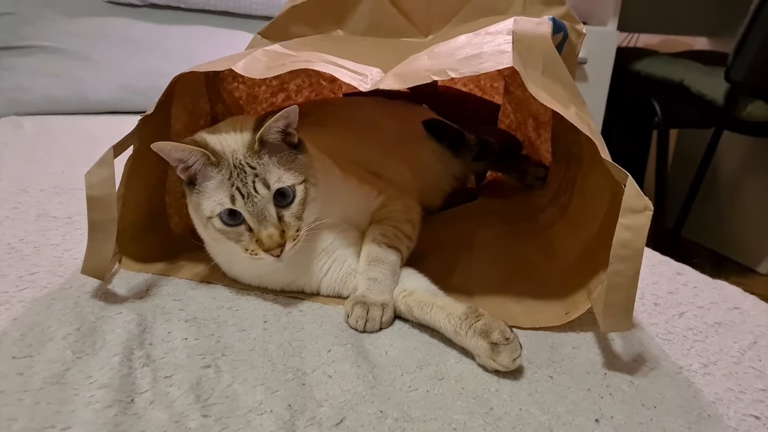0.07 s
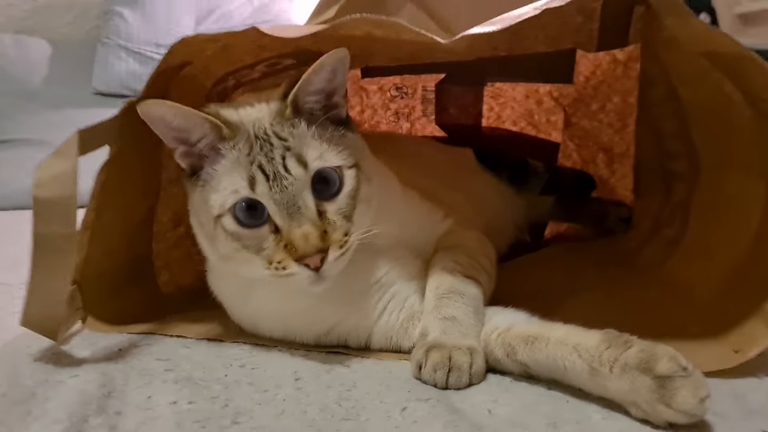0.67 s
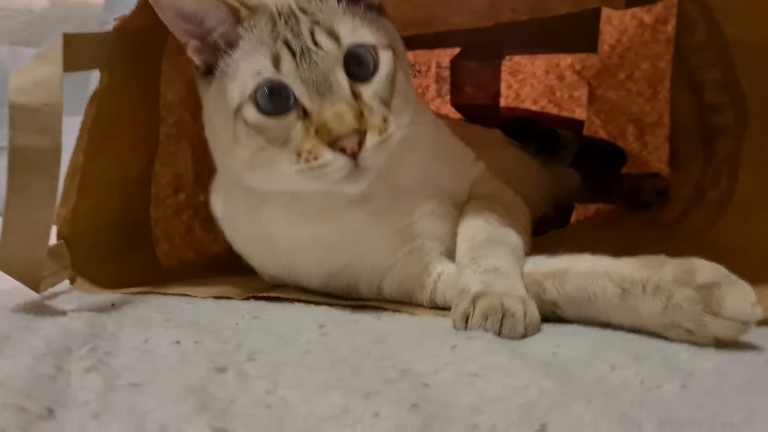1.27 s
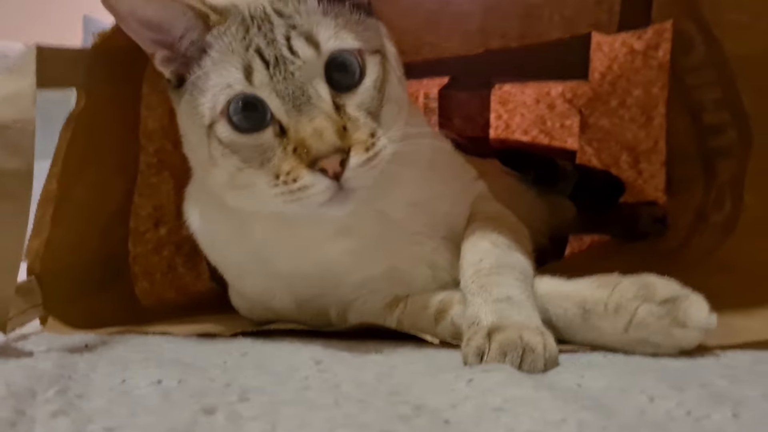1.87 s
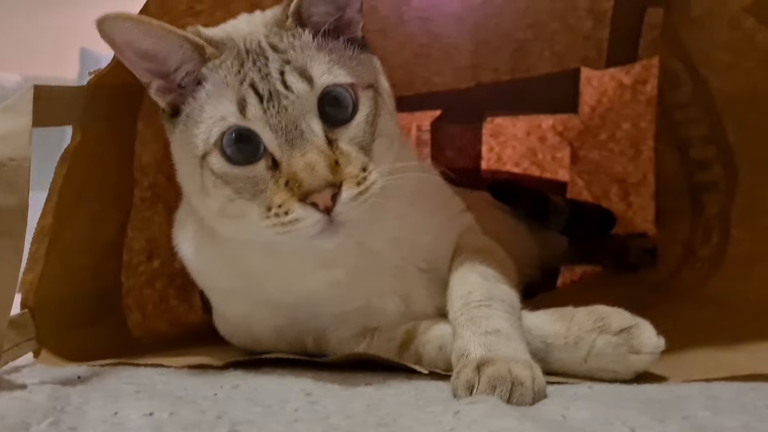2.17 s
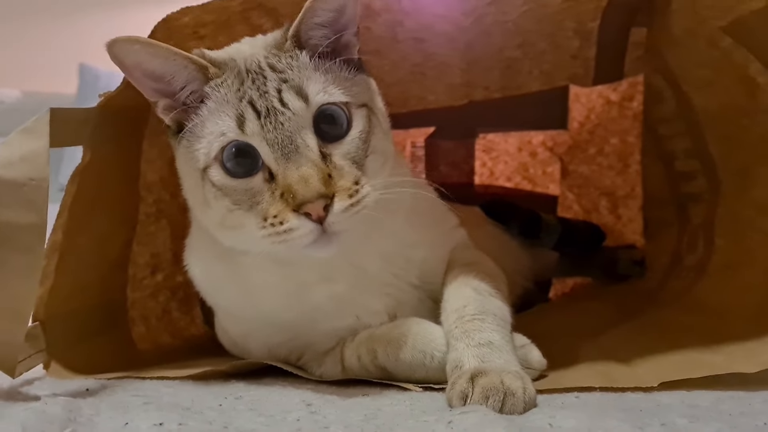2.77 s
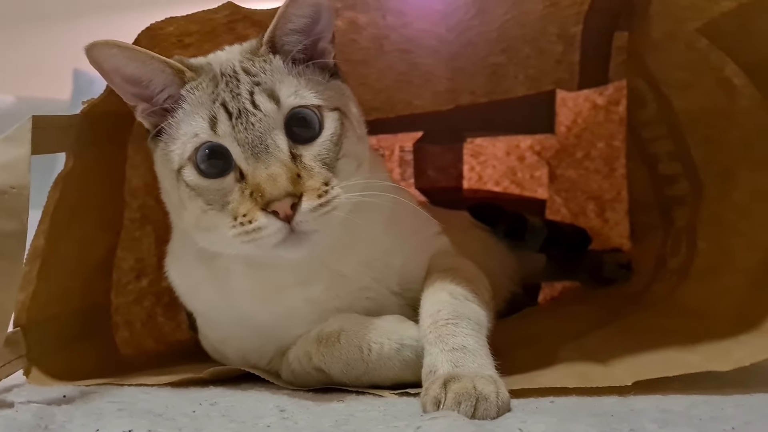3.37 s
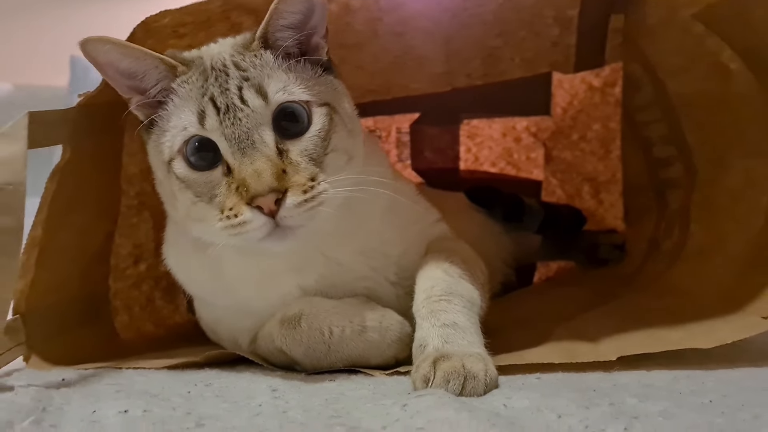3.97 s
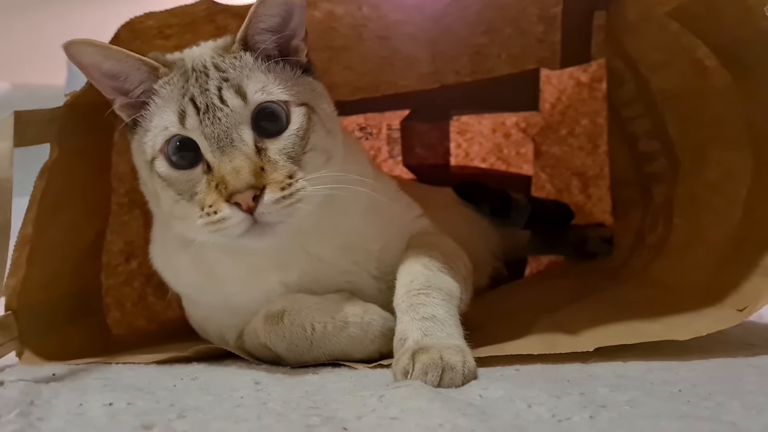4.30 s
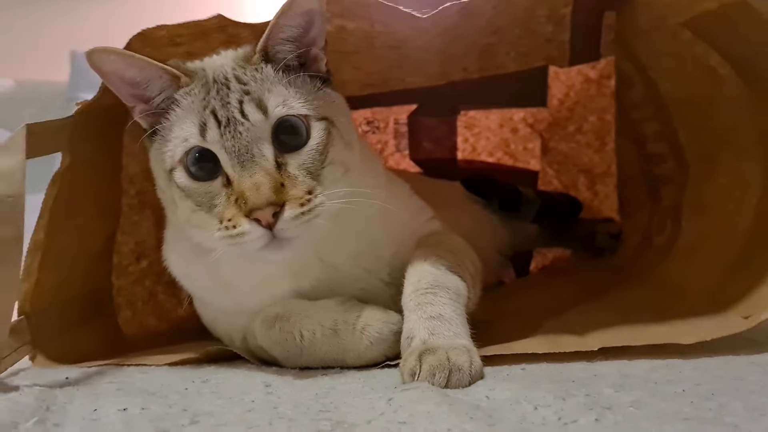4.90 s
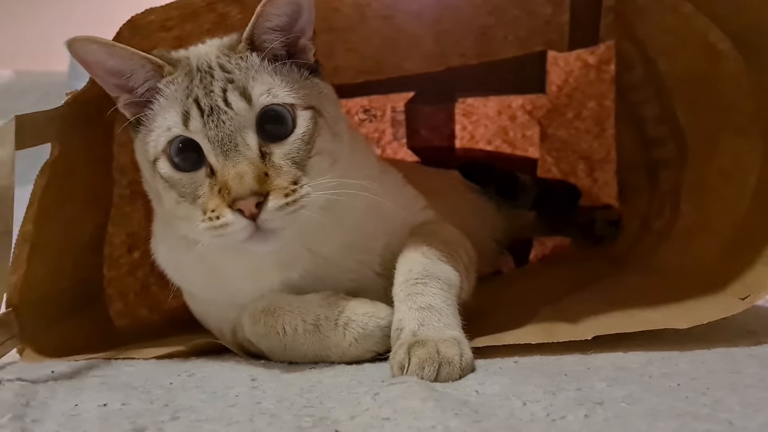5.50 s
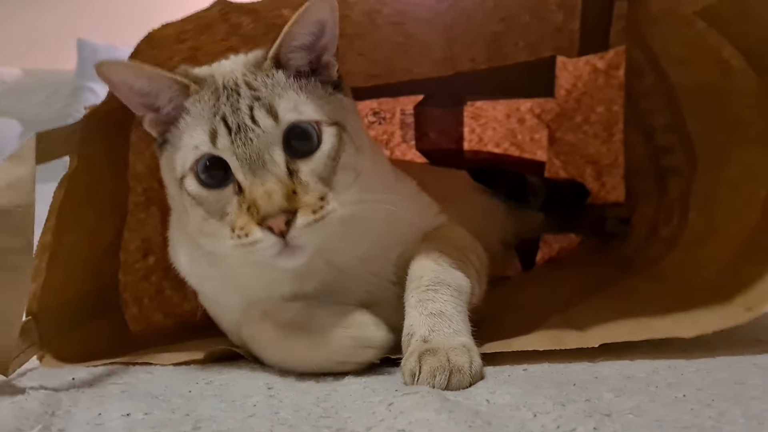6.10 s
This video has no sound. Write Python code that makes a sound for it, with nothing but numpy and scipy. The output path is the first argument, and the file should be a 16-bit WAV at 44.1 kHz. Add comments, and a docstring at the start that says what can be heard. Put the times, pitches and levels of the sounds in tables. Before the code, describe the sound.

Quiet paper bag ticks and slides, then close, hissing, thumping sweeps over fabric about twice a second in a still room.

```python
"""A quiet room with a faint mains hum; a cat lies in a paper bag on a blanket.
First the stiff paper slides, ticks as its creases snap, and squeaks thinly along an edge.
Then, close to the microphone, something sweeps over the fabric: once alone, then to and fro
about twice a second. Each stroke hisses, flutters and thumps as the surface drags and catches,
while the paper keeps ticking and sliding in between."""
import sys
import numpy as np
from scipy import signal
from scipy.fft import rfft, irfft
from scipy.io import wavfile
from scipy.ndimage import uniform_filter1d

SR = 44100
rng = np.random.default_rng(int(sys.argv[2]) if len(sys.argv) > 2 else 0)


def store_pcm(level_fs):
    """Save levels as 16-bit WAV."""
    pcm = np.round(np.clip(level_fs, -1, 1) * 32767).astype(np.int16)
    wavfile.write(sys.argv[1], SR, np.atleast_2d(pcm).T)


N = 275625
T, HZ = np.arange(N) / SR, np.fft.rfftfreq(N, 1 / SR)


def amp(db):
    """Decibels to gain."""
    return 10 ** (np.asarray(db) / 20)


def unit(x):
    """Scales to rms 1."""
    return x / np.sqrt(np.mean(x ** 2) + 1e-20)


def curve(points, hz):
    """Reads a breakpoint curve on a log-frequency axis."""
    freq_hz, value = np.transpose(points)
    return np.interp(np.log(hz + 1), np.log(freq_hz + 1), value)


def pan(pan_db):
    """Constant-power pan; pan_db is left over right."""
    pair = amp(np.array([[.5], [-.5]]) * pan_db)
    return pair / np.sqrt(np.mean(pair ** 2, 0))


def add(mix, start_s, sound):
    """Lays a stereo sound into the mix."""
    part = mix[:, max(round(start_s * SR), 0):][:, :sound.shape[1]]
    part += sound[:, :part.shape[1]]


def noise(spectrum, correlation):
    """Coloured stereo noise whose channels are partly alike."""
    left, other = rfft(rng.standard_normal((2, N)))
    alike = np.clip(curve(correlation, HZ), -1, 1)
    right = alike * left + np.sqrt(1 - alike ** 2) * other
    return unit(irfft(np.array([left, right]) * amp(curve(spectrum, HZ)), N))


def wander(rate_hz):
    """Smooth random modulation of rms 1."""
    return unit(irfft(rfft(rng.standard_normal(N)) * np.exp(-(HZ / rate_hz) ** 2), N))


def pulse(colour_db, size=4096):
    """The sharpest causal pulse with a given colour, peak 1."""
    log_gain = np.log(amp(colour_db(abs(np.fft.fftfreq(size, 1 / SR)))))
    wave = np.fft.ifft(np.exp(signal.hilbert(log_gain).conj())).real[:size // 2]
    return wave / abs(wave).max()


# Colour of the still air: freq_hz, gain_db
AIR_EQ = [(25, -16.5), (55, 4), (120, -4), (170, -8), (330, -6.5), (600, -12.5), (900, -16.5),
          (3000, -17.5), (5000, -21.5), (6800, -24.5), (7800, -36.5), (11000, -32.5), (12500, -30),
          (15500, -35.5)]
# Stereo image of the air: freq_hz, correlation
AIR_IMAGE = [(60, 0.22), (130, 0.61), (290, 0.71), (640, 0.41), (1400, 0.036)]
# Mains hum partials: pitch_hz, level_db
HUM_PARTIALS = [(102.3, -80), (199.2, -74), (301.5, -88), (398.4, -85)]


def room_tone(air_db=-69.5):
    """A bed of still air and slightly wavering mains hum."""
    hum = np.zeros(N)
    for pitch_hz, level_db in HUM_PARTIALS:
        phase = 2 * np.pi * pitch_hz * T + .5 * wander(rate_hz=3.7)
        hum += amp(level_db) * np.sqrt(2) * np.sin(phase)
    air = noise(AIR_EQ, AIR_IMAGE) * amp(air_db)
    return air * pan(-5) + hum * pan(-2.5)


# Reverb time by band: freq_hz, t60_s
ROOM_DECAY = [(100, 0.37), (400, 0.24), (1500, .33), (4000, 0.29), (12000, 0.054)]


def reverb(x, predelay_s=0.0062):
    """A small furnished room: sparse reflections, each band dying at its own speed."""
    taps = rng.standard_normal((2, SR)) * (rng.random((2, SR)) < .1) * (T[:SR] > predelay_s)
    hz, t, bands = signal.stft(taps, SR, nperseg=256)
    decay = amp(-60 * t / curve(ROOM_DECAY, hz)[:, None])
    tail = signal.istft(bands * decay, SR, nperseg=256)[1]
    return signal.fftconvolve(x, tail / np.linalg.norm(tail[0]), axes=1)[:, :N]


def bell(centre_hz, width_octaves):
    """A bell-shaped resonance on a log-frequency axis."""
    octaves_off = np.log2((np.fft.rfftfreq(SR, 1 / SR) + 1) / centre_hz)
    return 1 / (1 + .5 * (octaves_off / width_octaves) ** 2) ** 2


def scrape(colour, attack_s, decay_s, ripple_db=3, ripple_hz=110):
    """Friction noise swells and dies away, coloured by a paper panel's many close resonances."""
    t = T[:SR]
    swell = np.minimum(t / attack_s, 1) * np.exp(-np.maximum(t - attack_s, 0) / decay_s)
    panel = amp(ripple_db * unit(uniform_filter1d(rng.standard_normal(len(colour)), ripple_hz)))
    friction = rfft(rng.standard_normal((2, SR)))
    return unit(irfft(friction * colour * panel, SR)) * swell


# Slide cues: start_s, attack_s, decay_s, level_db, centre_hz, width_octaves
SLIDE_CUES = [ (0.25, .04, 0.28, -81.5, 5400, 0.57), (0.31, .025, 0.027, -64, 2600, 0.3),
              (0.33, 0.013, 0.11, -69, 370, 1.75), (0.481, 0.016, 0.32, -74, 4570, 0.98),
              (0.62, 0.013, 0.052, -67, 1370, 0.35), (0.67, 0.031, 0.3, -69, 2660, 0.33),
              (0.72, 0.012, 0.05, -65, 413, 0.55), (1.19, 0.05, 0.14, -72, 2700, 1.5),
              (1.48, 0.028, 0.1, -64.5, 130, 2), (1.70, 0.037, 0.25, -71, 4020, 1.26),
              (1.78, .04, 0.12, -65.5, 197, 1.33), (1.92, 0.024, 0.054, -56.5, 650, 0.91),
              (1.997, 0.003, 0.002, -50, 5950, 0.27), (2.14, 0.045, 0.15, -73.5, 4860, 0.86),
              (2.55, 0.0079, .017, -48, 2240, 1), (2.991, .006, 0.028, -54, 378, 1.12),
              (3.35, 0.065, 0.058, -69, 530, 0.78), (3.686, 0.0014, 0.016, -52, 3020, 0.6),
              (3.729, 0.012, 0.38, -75, 2620, 1.7), (4.2, .002, 0.011, -60, 6840, 0.38),
              (4.211, 0.043, 0.026, -61.5, 2140, 1.4), (4.357, 0.028, 0.028, -56, 375, 0.76),
              (4.85, 0.0044, 0.024, -52, 1630, 0.55), (4.889, 0.02, 0.013, -53.5, 2540, 0.4),
              (5.33, 0.046, 0.035, -57, 420, 1.2)]
# Bright slides sit further right: centre_hz, pan_db
SLIDE_PAN = [(300, -2), (1400, -3.5), (3000, -11), (6000, -8)]


def slides():
    """Paper and fur slide and settle as the cat shifts in the bag."""
    out = np.zeros((2, N))
    for start_s, attack_s, decay_s, level_db, centre_hz, width_octaves in SLIDE_CUES:
        slide = scrape(bell(centre_hz, width_octaves), attack_s, decay_s)
        add(out, start_s, amp(level_db) * slide * pan(curve(SLIDE_PAN, centre_hz)))
    return out


def buckle(decay_s=0.0036, count=11, size=220):
    """A crease gives way in a few jerks within five milliseconds."""
    jerks, at = np.zeros(size), rng.integers(8, size, count)
    jerks[at] = rng.choice([-1, 1], count) * np.exp(-T[at] / decay_s)
    jerks[0] = 1
    return jerks


# Crease snaps: start_s, level_db, bass_db, treble_db, ring_hz, pan_db, send_db
TICK_CUES = [ (0.535, -30, 4, -5.5, 1070, -2.5, 0.5), (0.628, -32, 4.5, -13, 1050, -1, -2.5),
             (1.440, -36, 19, -30, 600, -5, -1), (1.9982, -15.5, 8, -13, 1285, -4.5, -10),
             (2.272, -21, 9, 2, 1020, -2, -3.5), (2.548, -12.5, -27, -9.5, 3100, 3, -9),
             (2.994, -26, 9, -36, 1090, 5, -10), (3.684, -19, -1, 0, 1190, 6.5, -4.5),
             (3.726, -18, 3.5, -4.5, 2520, -2.5, -5.5), (4.202, -37.5, -1, -1, 6300, -7, 7),
             (4.852, -24, 2, -24, 1670, 1.5, -7), (4.897, -29.5, -27, 0, 2680, -15, -13),
             (5.345, -39.5, -22, -2, 2360, -19, 0.5)]
# Base colour of a snap: freq_hz, gain_db
CREASE_EQ = [(50, -31), (250, -1), (600, -0.5), (1200, -2.5), (1900, -8.5), (2800, -1.5), (4200, -6.5),
             (5000, -12.5), (6300, -17), (7800, -31), (15000, -50)]


def ticks(ring_db=7, ring_width_hz=200):
    """A crease snaps, its panel rings briefly, and the room answers."""
    direct, send = np.zeros((2, 2, N))
    for start_s, level_db, bass_db, treble_db, ring_hz, pan_db, send_db in TICK_CUES:
        tilt = [(350, bass_db), (800, 0), (1600, 0), (3000, treble_db)]
        panel = pulse(lambda hz: curve(CREASE_EQ, hz) + curve(tilt, hz)
                      + ring_db / (1 + ((hz - ring_hz) / ring_width_hz) ** 2))
        snap = np.convolve(buckle(), panel)
        gain = amp(level_db) * pan(pan_db)
        add(direct, start_s, gain * snap / np.linalg.norm(snap))
        add(send, start_s, gain * amp(send_db) * panel / np.linalg.norm(panel))
    return direct + reverb(send)


# Squeak cues: start_s, attack_s, decay_s, level_db, pitch_hz, boost_db, pan_db
SQUEAK_CUES = [ (1.098, 0.0082, 0.023, -59, 4530, -3, -13), (1.10, .013, .052, -60.5, 3590, 10, -4),
               (5.339, .009, 0.017, -58.5, 2630, 11, -10), (5.752, 0.02, 0.025, -55, 3060, -3.5, -8.5),
               (5.803, .009, 0.016, -65, 3160, 2, -6)]
# Resonances of a paper edge: pitch_ratio, width_octaves, gain_db
SQUEAK_MODES = [(0.982, 0.11, -0.5), (2.19, 0.036, -5.5), (2.9, 0.018, -4), (0.98, 1, -11.5)]


def squeaks():
    """A paper edge scrapes with a thin squeak; boost_db acts on every mode but the first."""
    out = np.zeros((2, N))
    for start_s, attack_s, decay_s, level_db, pitch_hz, boost_db, pan_db in SQUEAK_CUES:
        colour = sum(amp(gain_db + boost_db * (k > 0)) * bell(pitch_hz * ratio, width_octaves)
                     for k, (ratio, width_octaves, gain_db) in enumerate(SQUEAK_MODES))
        add(out, start_s, amp(level_db) * scrape(colour, attack_s, decay_s) * pan(pan_db))
    return out


SWING_DB = 30  # a stroke's level moves this far in one attack_s or release_s


def pressure(contact_s, attack_s, hold_s, release_s, smooth_s=0.0027, build_db=1):
    """A stroke presses in, bears down and lifts off: straight in decibels, with rounded corners."""
    away = np.maximum(contact_s - T, 0) / attack_s + np.maximum(T - contact_s - hold_s, 0) / release_s
    held_db = np.interp(T, [contact_s, contact_s + hold_s], [-build_db, 0])
    level_db = held_db - SWING_DB * np.minimum(away, 10)
    return amp(uniform_filter1d(level_db, int(smooth_s * SR)))


def rebound(lift_s, delay_s=0.047, swell_s=0.042, peak_db=-14):
    """The swell of the surface springing back after lift-off."""
    away = ((T - lift_s - delay_s) / swell_s) ** 2
    return amp(peak_db - SWING_DB * np.minimum(away, 10))


def slips(spectrum, per_s, spread_db):
    """Irregular small slips, each pushing the surface one way or the other."""
    clicks = (rng.random(N) < per_s / SR) * rng.choice([-1, 1], N)
    clicks = clicks * amp(spread_db * rng.standard_normal(N))
    return unit(signal.oaconvolve(clicks, pulse(lambda hz: curve(spectrum, hz)))[:N])


def levelled(x, size=1100):
    """Irons out slow random swells, so that the stroke alone sets the force."""
    return x / np.sqrt(uniform_filter1d((x ** 2).mean(0), size) + 1e-9)


# Sweeps over the fabric, timed at firm contact:
# contact_s, attack_s, hold_s, release_s, thrum_db, flutter_db, hiss_db, hiss_pan_db
STROKE_CUES = [ (1.318, 0.021, 0.013, 0.066, -43, -58.5, -71.5, -3),
               (2.518, 0.06, 0.043, 0.04, -28, -44, -54.5, -9),
               (3.09, 0.048, 0.038, 0.18, -46.5, -55.5, -58, -9.5),
               (3.577, 0.043, 0.019, 0.12, -32, -48, -53, -6.5),
               (4.103, 0.078, 0.016, 0.11, -40, -46, -50, -7.5),
               (4.632, 0.054, 0.043, .085, -30.5, -39, -49, -5.5),
               (5.074, .06, 0.013, 0.055, -43.5, -47.5, -54.5, -4.5),
               (5.136, 0.034, 0.034, 0.17, -65, -76, -63, -4.5),
               (5.592, 0.041, 0.033, 0.1, -30, -34.5, -46, -4.5),
               (6.076, 0.072, 0.0086, .075, -43.5, -51, -55, -5)]
# Colours of a stroke's low, middle and top layers: freq_hz, gain_db
THRUM_EQ = [(20, -54), (40, -25), (62, 0), (95, 6), (130, 1.5), (180, 2), (240, -7), (400, -44),
            (1000, -58)]
FLUTTER_EQ = [(80, -33), (200, -13), (270, -1), (355, 8), (480, -2), (620, 0), (780, -1), (1050, -5),
              (1500, -7), (2100, -23.5), (4000, -71)]
HISS_EQ = [(300, 1.1), (900, 2), (1500, 20.2), (2100, 13), (2800, 19.5), (3800, 15), (5000, 10.7),
           (6600, 13), (8200, 10.2), (11000, 6.4), (15500, 7.4)]
# Stereo image of the rubbing: freq_hz, correlation
RUB_IMAGE = [(60, 0.43), (300, 0.95), (700, 1), (1400, 1), (3000, 0.56)]


def strokes(thrum_lag_s=0.0068, flutter_lead_s=0.0037, hiss_lag_s=0.0044):
    """Each sweep drags fibres (hiss), sticks and slips (flutter) and shakes the surface (thrum)."""
    shake, slip, brush = np.zeros(N), np.zeros(N), np.zeros((2, N))
    for contact_s, attack_s, hold_s, release_s, thrum_db, flutter_db, hiss_db, pan_db in STROKE_CUES:
        weight = pressure(contact_s + thrum_lag_s, attack_s, hold_s, release_s)
        shake += amp(thrum_db) * np.maximum(weight, rebound(contact_s + hold_s))
        # The slipping stops sooner than the surface settles.
        slip += amp(flutter_db) * pressure(contact_s - flutter_lead_s, attack_s, hold_s, .91 * release_s)
        # Fibres brush before and after the firm contact.
        graze = pressure(contact_s + hiss_lag_s, 0.11, hold_s, release_s=0.14, smooth_s=0.018)
        brush += amp(hiss_db) * graze * pan(pan_db)
    thrum = shake * levelled(noise(THRUM_EQ, RUB_IMAGE)) * pan(8.5)
    catching = slips(FLUTTER_EQ, per_s=400, spread_db=0.5) + amp(1.5) * noise(FLUTTER_EQ, RUB_IMAGE)
    flutter = slip * levelled(catching) * pan(2)
    hiss = brush * noise(HISS_EQ, RUB_IMAGE) * amp(wander(rate_hz=140))
    return thrum + flutter + hiss + reverb(amp(-18) * flutter + amp(-15.5) * hiss)


# Thump cues: start_s, peak_db, pan_db
THUMP_CUES = [(1.326, -42, 5), (2.516, -22.5, 2), (2.568, -26, 3.5), (2.827, -51.5, 6), (3.577, -29.5, 9),
              (3.588, -30.5, 2), (3.605, -32.5, 6), (4.099, -37, -8), (4.122, -39.5, -10), (4.637, -24, 13),
              (4.646, -20.5, 4), (5.082, -37.5, 1), (5.089, -42, -9), (5.586, -15.5, 6), (5.603, -23, 6),
              (5.716, -35.5, -1.5), (6.079, -32, -4)]
# Colour of a thump: freq_hz, gain_db
THUMP_EQ = [(25, -48), (50, -9.5), (90, 12), (180, -3), (370, 6.5), (700, -5.5), (1400, -19), (2200, -23),
            (6000, -44.5)]


def thumps():
    """Dull pushes where the rubbed surface catches hardest and lets go."""
    out = np.zeros((2, N))
    push = pulse(lambda hz: curve(THUMP_EQ, hz))
    for start_s, peak_db, pan_db in THUMP_CUES:
        add(out, start_s, push * amp(peak_db) * pan(pan_db))
    return out + reverb(out) * amp(-9.5)


def mic_delay(x, lag_s=0.0001856):
    """Delays the right channel by the travel time between the microphones."""
    return np.array([x[0], np.interp(T - lag_s, T, x[1])])


def scene():
    """Room tone under the grainy, ticking paper and the close strokes on the fabric."""
    grain = amp(2.7 * wander(rate_hz=600))
    paper = (slides() + squeaks()) * grain
    return room_tone() + paper + reverb(paper) * amp(-5) + ticks() + mic_delay(strokes() + thumps())


def record(dry, low_cut_hz=38, high_cut_hz=15750):
    """A low cut drops the deepest rumble; a steep high cut trims the very top."""
    low_cut = signal.butter(2, low_cut_hz, "highpass", fs=SR, output="sos")
    high_cut = signal.firwin(801, high_cut_hz, window=("kaiser", 9), fs=SR)
    return signal.oaconvolve(signal.sosfilt(low_cut, dry), high_cut[None], "same")


dry = scene()
out = record(dry)
store_pcm(out)
```